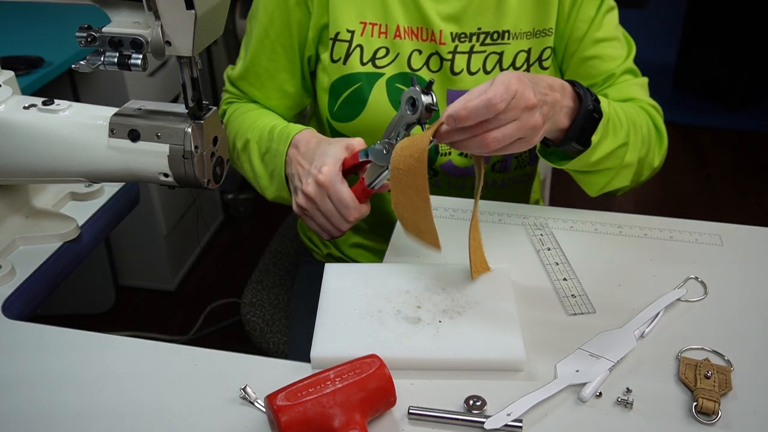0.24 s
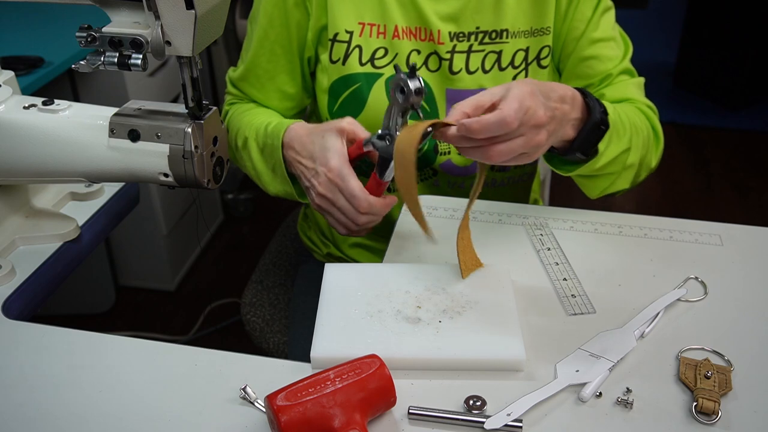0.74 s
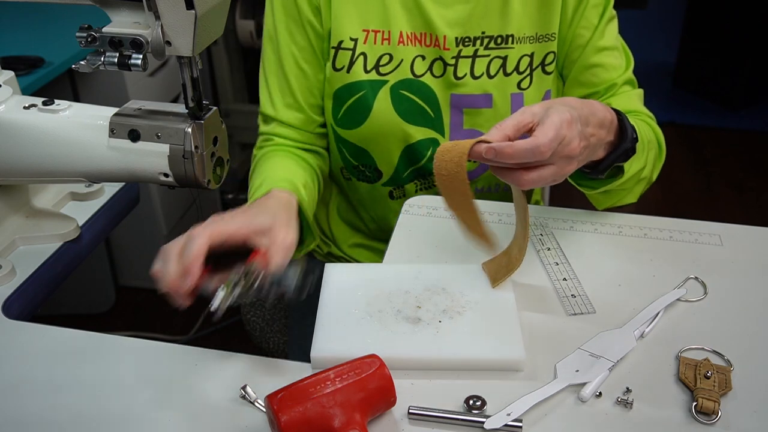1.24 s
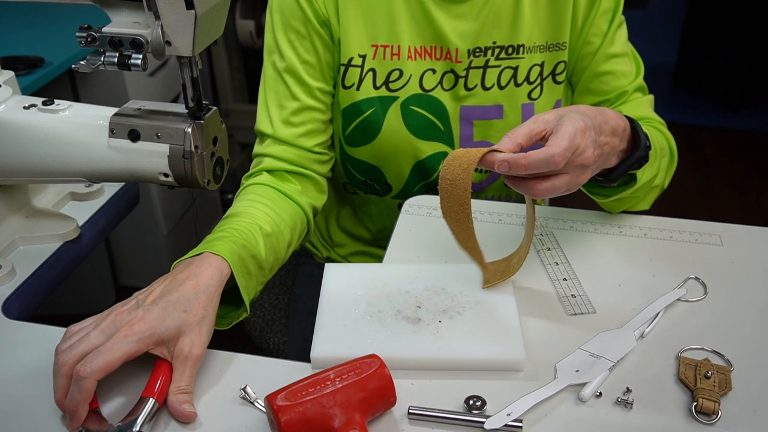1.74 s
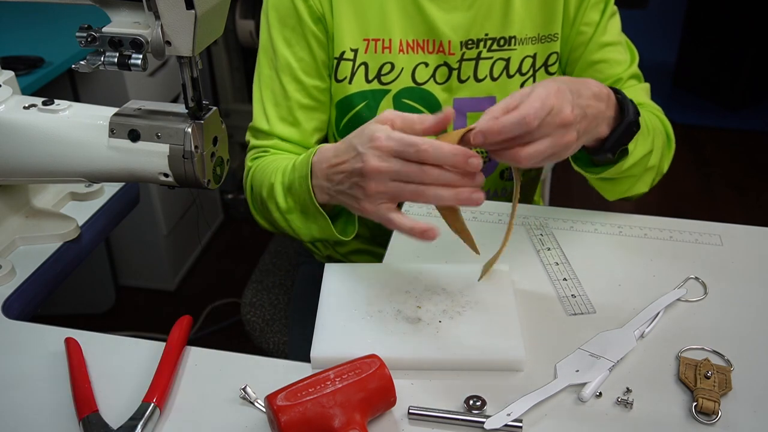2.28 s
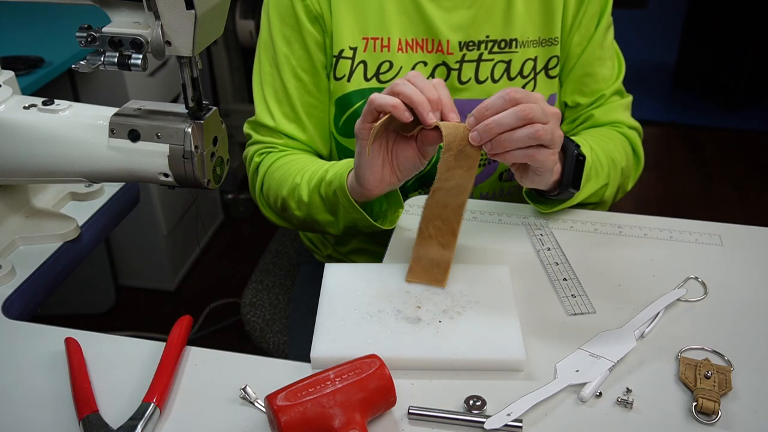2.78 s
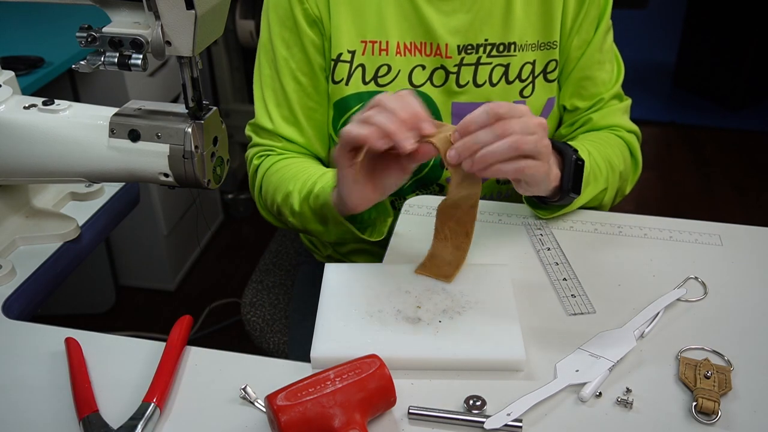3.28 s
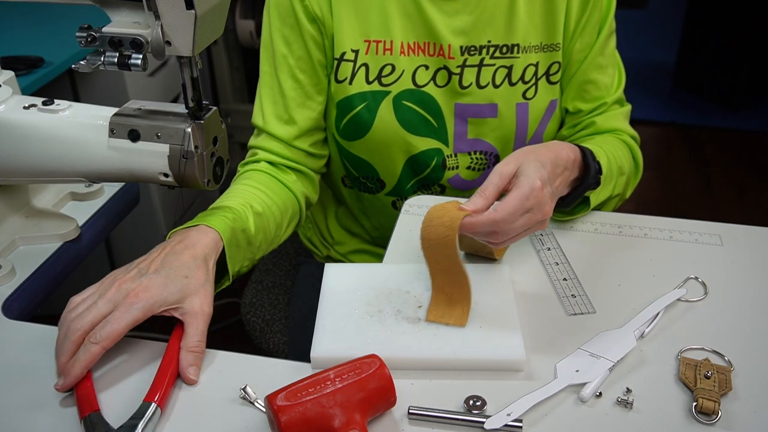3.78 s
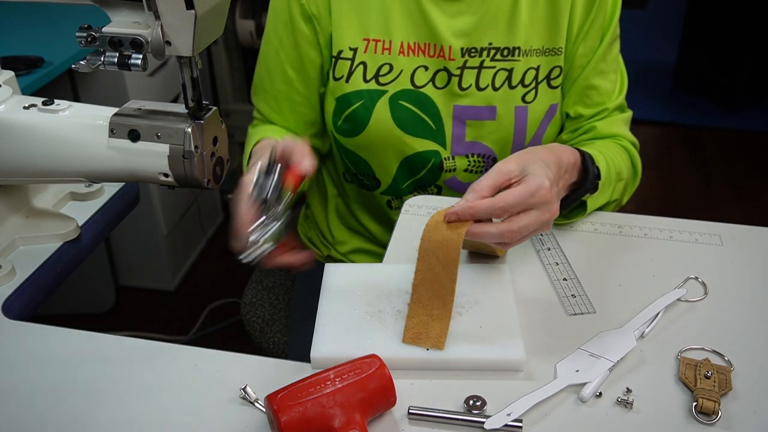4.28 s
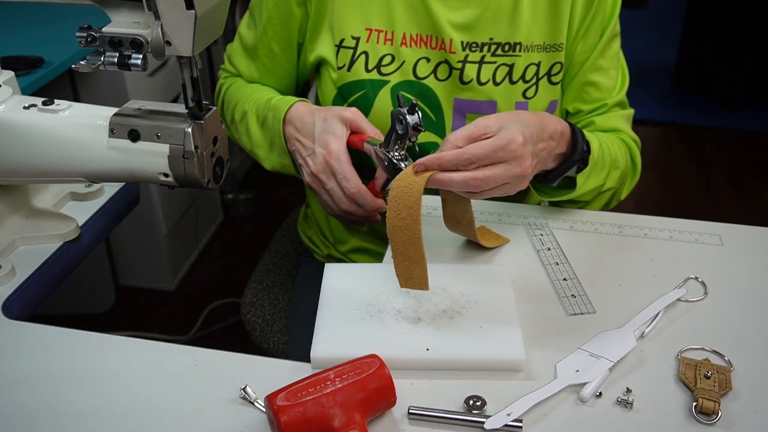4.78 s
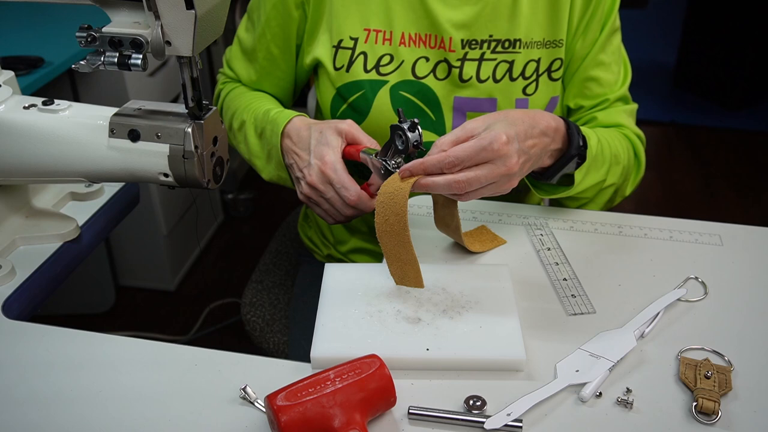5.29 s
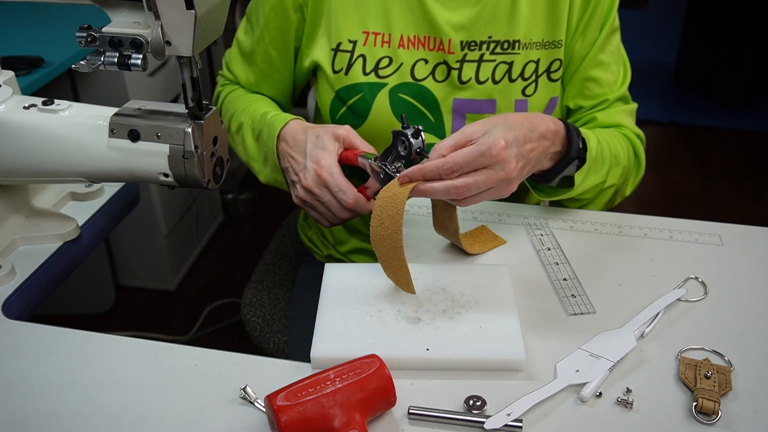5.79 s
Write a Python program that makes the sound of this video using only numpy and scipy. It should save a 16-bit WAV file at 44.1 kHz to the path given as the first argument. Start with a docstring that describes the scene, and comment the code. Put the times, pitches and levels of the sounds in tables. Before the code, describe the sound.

In a quiet, airy workroom, hand pliers knock and clatter onto a bench, are picked up with small metallic clicks, then crunch once through leather.

```python
"""Steel punch pliers are put down on a workbench, close to a stereo microphone: nose first, then a loud
knock and a rattle, from a push on the board, its ringing modes and a burst of steel noise.
Before that the punch tube shifts in a leather strap and the jaws click. Afterwards fingers rub leather and grips
(swelling hiss), more small clicks (brief noise and a ring) follow as the pliers are picked up, and the punch snaps
through. Behind it all lies a small workroom with a steady low rush of air (coloured noise)."""
import sys
import numpy as np
from scipy import signal
from scipy.fft import rfft, irfft, next_fast_len
from scipy.io import wavfile
from scipy.ndimage import uniform_filter1d

SR = 44100
rng = np.random.default_rng(int(sys.argv[2]) if len(sys.argv) > 2 else 0)


def to_wav(s):
    """Save 16-bit WAV."""
    ch = np.atleast_2d(s).T  # columns
    pcm = np.round(np.clip(ch, -1, 1) * 32767)  # PCM
    wavfile.write(sys.argv[1], SR, pcm.astype(np.int16))


N = 266187

# Ventilation and faint hiss in the room: (frequency [Hz], density [dB per Hz])
AIR_SPECTRUM = [(12, -55.5), (20, -25), (154, -4), (187, 0.5), (228, -2.5), (262, -6), (472, -10.5),
                (558, -12), (607, -12), (1400, -16), (2140, -17), (2600, -18.5), (3340, -19.5),
                (13900, -33.5), (16000, -34.5)]
# How alike the air is at left and right: (frequency [Hz], likeness [0-1])
AIR_LIKENESS = [(60, 0.84), (150, 0.9), (380, 0.72), (950, 0.57), (2380, 0.49), (5980, 0.23), (15000, 0.04)]
# How alike the room's answer is at left and right: (frequency [Hz], likeness [0-1])
ROOM_LIKENESS = [(300, .99), (800, 0.98), (1600, 0.53), (4000, 0.92), (10000, .1)]
# Decay of the workroom's tail: (frequency [Hz], t60 [s])
ROOM_DECAY = [(120, 1), (400, 0.42), (1500, .5), (4000, 0.52), (9000, 0.71), (15000, 0.69)]
# Skin on leather: (frequency [Hz], density [dB per Hz])
SKIN_SPECTRUM = [(710, -37), (1200, -11), (1700, -6.5), (2320, -4), (3740, -0.5), (4550, -3),
                 (14500, -10.5), (16000, -13)]
# A hand slides on leather or grips: (time at its fastest [s], hiss level [dB], length [s],
# narrow swish over the hiss [dB])
HAND_STROKES = [(2.575, -62.5, 0.3, -2), (2.76, -70.5, 0.08, -14), (3.349, -51, 0.086, -10),
                (3.486, -66, 0.23, -18), (3.68, -60.5, 0.16, -22), (3.868, -61, 0.45, -18)]
# The punch tube shifts in the strap, later breaks through and seats:
# (time [s], level [dB], crispness from 9 kHz up [dB])
PUNCH_SNAPS = [(0.3727, -53, -36), (5.0719, -41, 1), (5.0757, -51, -19)]
# Leather giving way: (frequency [Hz], density [dB per Hz])
LEATHER_SPECTRUM = [(410, -60), (700, -26), (875, -12), (1300, -14), (1950, -1.5), (2300, -10),
                    (2630, -6.5), (3790, -6), (5190, -25), (6070, -19), (6480, -26), (8210, -23),
                    (11300, -3.5), (12800, -20), (16000, -14.5)]
# Ring of the closed jaws: (frequency [Hz], level [dB], t60 [s])
ANVIL_MODES = [(1741, -8, .05), (1941, 0, .14), (2240, -10, .09), (3060, -11, .08), (10630, -10, .03),
               (11234, -7, .03)]
# The jaws and the punch wheel click: (time [s], level [dB], pitch that the contact favours [Hz],
# crispness from 9 kHz up [dB])
JAW_CLICKS = [(0.7276, -55, 4000, 10), (0.7627, -40, 4200, -2.5), (3.6634, -55, 2810, 0),
              (3.7074, -57.5, 6130, 6), (3.725, -55, 8520, 17), (4.326, -41.5, 4030, 8),
              (4.4816, -54, 4580, -1), (4.5388, -60.5, 4500, 12.5), (4.5831, -58.5, 4500, 6),
              (4.7215, -64.5, 11000, -1)]
# Steel slipping in the jaws: (frequency [Hz], density [dB per Hz])
JAW_SPECTRUM = [(900, -33), (2200, -3.5), (2800, -11.5), (3400, -3.5), (3900, -3.5), (4400, -0.5),
                (5200, -7), (7100, -10), (9000, -14), (10500, -10.5), (13800, -18.5), (16000, -22)]
# Ring of the pliers: (frequency [Hz], level [dB], t60 [s])
PLIER_MODES = [(3500, -7, .13), (4394, -4, .2), (4484, 0, .33), (5810, -9, .18), (7140, -10, .17),
               (7215, -7, .14), (10510, -15, .15)]
# The hand lands on the grips and pushes off: (time [s], level [dB])
PALM_PUSHES = [(3.598, -49), (3.606, -47), (3.978, -53.5), (4.000, -51.5), (4.022, -60)]
# Dull push of flesh and rubber: (frequency [Hz], density [dB per Hz])
PALM_SPECTRUM = [(60, -23), (200, -19.5), (320, 4.5), (420, -10.5), (520, -11.5), (800, -20), (1500, -36),
                 (4000, -62)]
# The pliers meet the bench: (time [s], knock level [dB], steel rattle level [dB])
BENCH_BLOWS = [(1.8847, -27, -34.5), (1.8914, -32, -38), (1.9145, -27.5, -54.5), (1.972, -47.5, -46),
               (1.9980, -29.5, -43.5), (2.0299, -15, -33.5), (2.0311, -18.5, -36.5), (2.0340, -17.5, -41.5),
               (2.0482, -20.5, -43.5), (2.0686, -24, -46.5), (2.0920, -29, -47.5), (2.0985, -27.5, -36.5)]
# The bench top with the pliers on it: (frequency [Hz], level [dB], t60 [s])
BENCH_MODES = [(377, -13, .17), (421, -14, .17), (512, -11, .18), (643, -8, .14), (761, -7, .13),
               (922, -12, .13), (1082, -9, .13), (1195, -11, .11), (1251, -11, .11), (1527, -7, .12),
               (1595, -8, .11), (1650, -9, .12), (1740, -12, .09), (2421, -17, .08), (2860, -17, .06),
               (3110, -19, .06)]
# Steel chattering on the bench: (frequency [Hz], density [dB per Hz])
RATTLE_SPECTRUM = [(800, -22.5), (1300, -21), (1660, 8), (2000, -7.5), (2600, -3), (4000, 0), (5600, 0.5),
                   (8200, -3.5), (11000, -10), (16000, -19.5)]
# The bench's answer to the steel nose, before blending: (frequency [Hz], density [dB per Hz])
NOSE_PUSH = [(25, -54), (60, -25), (100, -9), (145, -3.5), (240, -9.5), (320, 0.5), (500, -1.5), (640, 0),
             (800, -6.5), (1330, -17.5), (1620, -3), (2000, -12), (3400, -22), (7000, -39)]
# The bench's answer to the pliers' whole side, before blending: (frequency [Hz], density [dB per Hz])
SIDE_PUSH = [(25, -50), (60, -29), (100, -22.5), (185, -13.5), (250, -18.5), (400, -5.5), (660, -5),
             (850, -5.5), (1330, -0.5), (1580, -3.5), (2000, -11.5), (2900, -10.5), (3500, -17.5),
             (7000, -38.5)]

TOP_HZ = 15950  # upper band limit of the sound
AIR_DB = -60
STROKE_RANGE_DB = 14.5  # swell from a stroke's ends to its peak
STROKE_RISE = 0.46  # share of a stroke's length spent speeding up
SWISH_HZ, SWISH_WIDTH_HZ = 3750, 330  # pitch at the stroke's peak, half width of the band
SWISH_GLIDE_OCTAVES = 0.45  # rise over a stroke
LIFT_S = 4.1  # the pliers leave the bench
DAMPED_RING_DB, FREE_RING_DB = -36, -18  # their ring against leather or bench, and held in the air
TIP_S, TIP_LENGTH_S = 1.97, 0.06  # the pliers start to tip from nose to side, and the time that takes
NOSE_FLAT, SIDE_FLAT = 0.05, 0.9  # how flat they land before and after (0 nose - 1 side)
# bare steel knocks brightly and rattles; the rubber grips do neither
HARD_HZ, HARD_RATTLE_DB = 4200, -33.5  # knock's treble limit at this rattle level
SOFTEN_DB_PER_OCTAVE = 6  # drop in rattle that lowers that limit by an octave
T = np.arange(int(.7 * SR)) / SR  # time within one short sound [s]
IMPULSE = 1.0 * (T == 0)


def amp(db):
    """Decibels to gain."""
    return 10 ** (np.asarray(db) / 20)


def unit(x):
    """Scale to rms 1."""
    return x / np.sqrt(np.mean(x ** 2) + 1e-20)


def onset_unit(x):
    """Scale so that the first 4 ms have rms 1."""
    return x / np.sqrt(np.mean(x[..., :SR // 250] ** 2) + 1e-20)


def along(points, hz):
    """Read (Hz, value) points on a log axis."""
    f, v = np.transpose(points)
    return np.interp(np.log(hz + 1), np.log(f + 1), v)


def coloured(x, gain):
    """Causal (minimum-phase) filter with the given gain against frequency."""
    n = x.shape[-1]
    m = 2 * next_fast_len(n)
    log_gain = np.log(np.maximum(gain(np.fft.rfftfreq(m, 1 / SR)), 1e-6))
    cepstrum = irfft(log_gain, m)
    # folding the cepstrum onto positive time makes the phase minimum
    cepstrum[1:m // 2] *= 2
    cepstrum[m // 2 + 1:] = 0
    response = np.exp(rfft(cepstrum))
    return irfft(rfft(x, m) * response, m)[..., :n]


def shaped(x, spectrum):
    """Give x the colour of (Hz, dB) points."""
    return coloured(x, lambda hz: amp(along(spectrum, hz)))


def favour(hz, centre_hz, lift_db, octaves):
    """Where a thing is struck decides which part of its range speaks most."""
    distance = np.log2((hz + 1) / centre_hz) / octaves
    return amp(lift_db * (np.exp(-distance ** 2) - 1))


def pair(alike, size):
    """Two white noises, left and right, that are as alike as the (Hz, likeness) points say."""
    m = next_fast_len(size)
    likeness = np.clip(along(alike, np.fft.rfftfreq(m, 1 / SR)), -1, 1)
    turn = np.arccos(likeness) / 2
    spectra = rfft(rng.standard_normal((2, m))) * [np.cos(turn), np.sin(turn)]
    mid, side = irfft(spectra, m)[:, :size]
    return np.array([mid + side, mid - side])


def fade(t60):
    """Exponential decay, 60 dB down at t60."""
    return np.exp(-np.log(1000) * T / np.maximum(t60, 1e-4))


def ring(modes, scatter_db):
    """Damped modes of alternating sign, struck at slightly new strengths each time."""
    out = np.zeros(len(T))
    for k, (hz, db, t60) in enumerate(modes):
        strength = amp(db + scatter_db * rng.standard_normal())
        out += (-1) ** k * strength * fade(t60) * np.sin(2 * np.pi * hz * T)
    return out


def crack(spectrum, crisp_db, length):
    """A few milliseconds of noise for tiny slips that swell and stop."""
    u = T / length
    burst = pair([(3000, 0.95), (12000, 0.6)], len(T)) * u * np.exp(-u * u)
    return shaped(onset_unit(shaped(burst, spectrum)), [(5000, 0), (9000, crisp_db)])


def in_room(x, early_db, early_t60, late_db, treble_db):
    """Quick scatter off nearby things, then the room's tail; hands shade the treble that reaches the walls."""
    hz, t, z = signal.stft(pair(ROOM_LIKENESS, len(T)), SR, nperseg=256)
    decay = np.exp(-np.log(1000) * t / along(ROOM_DECAY, hz)[:, None])
    late = signal.istft(z * decay, SR, nperseg=256)[1][:, :len(T)]
    late = unit(late * np.clip((T - .004) / 0.016, 0, 1))  # the tail builds up from 4 to 20 ms
    late = shaped(late, [(2500, 0), (11000, treble_db)])
    early = unit(pair(ROOM_LIKENESS, len(T)) * fade(early_t60) * (T > .002))
    answer = amp(early_db) * early + amp(late_db) * late
    answer = answer / np.sqrt(len(T))  # energy now relative to the direct sound
    return x + signal.fftconvolve(np.atleast_2d(x), answer, axes=1)[:, :len(T)]


def add(track, s, x):
    """Mix x into the track at time s."""
    start = round(s * SR)
    track[:, start:start + x.shape[-1]] += x[:, :N - start]


def air():
    """The steady rush of ventilation and a faint hiss: coloured noise, wider towards the treble."""
    return amp(AIR_DB) * unit(shaped(pair(AIR_LIKENESS, N), AIR_SPECTRUM))


def swish(hz):
    """A narrow band of noise that follows a pitch curve."""
    slow = coloured(rng.standard_normal((2, N)), lambda f: 1 / (1 + (f / SWISH_WIDTH_HZ) ** 2))
    return unit(slow * np.cos(2 * np.pi * np.cumsum(hz) / SR))


def rubbing():
    """Skin catches on the leather's grain: each stroke swells a hiss of uneven slips with a rising swish."""
    out = np.zeros((2, N))
    unevenness = unit(uniform_filter1d(rng.standard_normal(N), size=90))  # about 2 ms per slip
    grain = amp(1.38 * unevenness)
    hiss = unit(shaped(pair([(2000, 0.84), (10000, 0.37)], N) * grain, SKIN_SPECTRUM))
    for s, db, length, swish_db in HAND_STROKES:
        progress = (np.arange(N) / SR - s) / length  # 0 at the fastest moment
        drop = np.maximum(-progress / STROKE_RISE, progress / (1 - STROKE_RISE))
        level = amp(db - STROKE_RANGE_DB * drop)
        band = swish(SWISH_HZ * 2 ** (SWISH_GLIDE_OCTAVES * np.clip(progress, -1, 1)))
        out += level * (hiss + amp(swish_db) * band)
    return out


def palm():
    """Soft flesh on the rubber grips gives only a dull push into the bench."""
    out = np.zeros((2, N))
    thud = onset_unit(shaped(IMPULSE, PALM_SPECTRUM))
    for s, db in PALM_PUSHES:
        add(out, s, amp(db) * in_room(thud, early_db=-1.5, early_t60=0.24, late_db=-3.5, treble_db=-3))
    return out


def clicks():
    """Steel slips on steel as the pliers are handled; it rings more once they are lifted clear."""
    out = np.zeros((2, N))
    for s, db, spot_hz, crisp_db in JAW_CLICKS:
        slip = crack(JAW_SPECTRUM, crisp_db, length=0.00234)
        slip = coloured(slip, lambda hz: favour(hz, spot_hz, lift_db=7.5, octaves=0.76))
        steel = onset_unit(ring(PLIER_MODES, scatter_db=1.5))
        ring_db = FREE_RING_DB if s > LIFT_S else DAMPED_RING_DB
        click = onset_unit(slip) + amp(ring_db) * steel
        add(out, s, amp(db) * in_room(click, early_db=-7, early_t60=.08, late_db=-5, treble_db=-2))
    return out


def punch():
    """The tube moves in the strap or snaps onto the anvil; leather and fingers damp and shade the ring."""
    out = np.zeros((2, N))
    for s, db, crisp_db in PUNCH_SNAPS:
        jaws = onset_unit(ring(ANVIL_MODES, scatter_db=1))
        jaws = shaped(jaws, [(5000, 0), (9000, crisp_db)])
        snap = crack(LEATHER_SPECTRUM, crisp_db, length=0.0023) + amp(-10.5) * jaws
        add(out, s, amp(db) * in_room(snap, early_db=-10.5, early_t60=.05, late_db=-5.5, treble_db=-17))
    return out


def bench_knock(flat, rattle_db):
    """A blow pushes the board and rings its modes; the more steel in the contact, the brighter the knock."""
    def push_gain(hz):
        # the weights add up to 1.5, which deepens the contrasts of both spectra
        return amp((1.5 - flat) * along(NOSE_PUSH, hz) + flat * along(SIDE_PUSH, hz))

    push = coloured(IMPULSE, push_gain)
    modes = ring(BENCH_MODES, scatter_db=1.5)
    knock = onset_unit(push) + amp(-16.5) * onset_unit(modes)
    hard_hz = HARD_HZ * 2 ** ((rattle_db - HARD_RATTLE_DB) / SOFTEN_DB_PER_OCTAVE)
    return coloured(knock, lambda hz: 1 / np.sqrt(1 + (hz / hard_hz) ** 4))


def steel_rattle():
    """Steel chatters as a short noise burst while the pliers ring faintly."""
    burst = pair([(2000, 0.97), (9000, 0.39)], len(T)) * fade(0.033)
    chatter = onset_unit(shaped(burst, RATTLE_SPECTRUM))
    return chatter + amp(-28.5) * onset_unit(ring(PLIER_MODES, scatter_db=3))


def bench():
    """The pliers land in a run of blows, tipping from nose to side; each one knocks and rattles."""
    out = np.zeros((2, N))
    for s, db, rattle_db in BENCH_BLOWS:
        flat = np.interp(s - TIP_S, [0, TIP_LENGTH_S], [NOSE_FLAT, SIDE_FLAT])
        knock = amp(db) * bench_knock(flat, rattle_db)
        steel = amp(rattle_db) * steel_rattle() * amp([[.5], [-.5]])  # slightly left
        add(out, s, in_room(knock, early_db=-6, early_t60=0.075, late_db=-3.0, treble_db=-1))
        add(out, s, in_room(steel, early_db=-5.0, early_t60=.08, late_db=-7.5, treble_db=-1.5))
    return out


def scene():
    """Everything at the bench, over the air of the room."""
    return air() + rubbing() + palm() + clicks() + punch() + bench()


def record(dry):
    """The stereo microphone's signal keeps nothing above the band limit."""
    m = next_fast_len(N + SR // 2)
    passed = np.fft.rfftfreq(m, 1 / SR) < TOP_HZ
    return irfft(rfft(dry, m) * passed, m)[:, :N]


dry = scene()
out = record(dry)
to_wav(out)
```